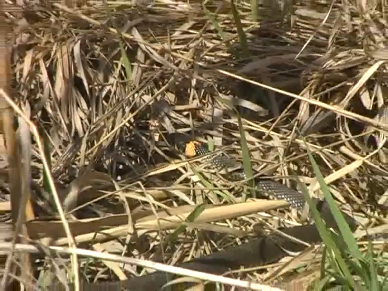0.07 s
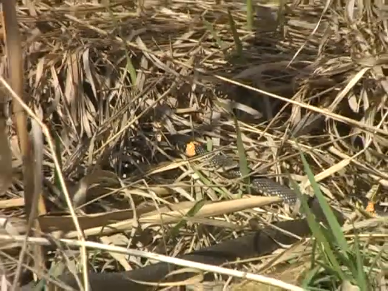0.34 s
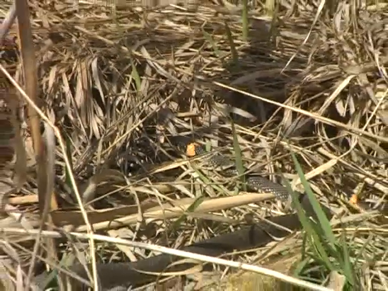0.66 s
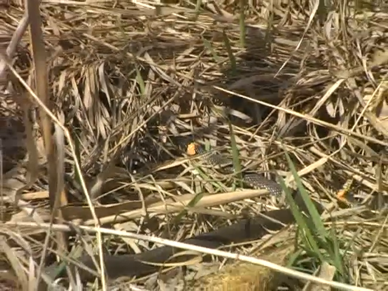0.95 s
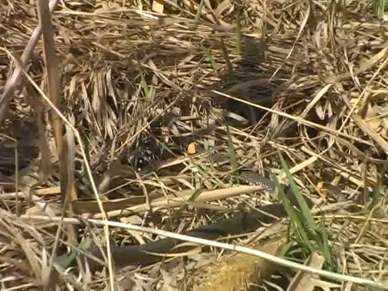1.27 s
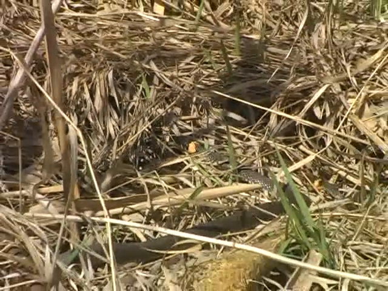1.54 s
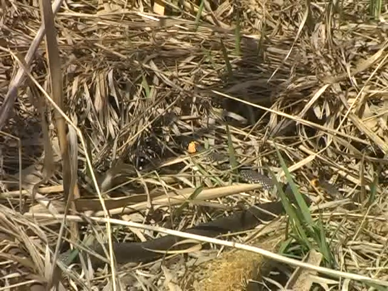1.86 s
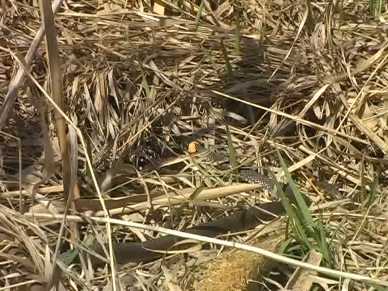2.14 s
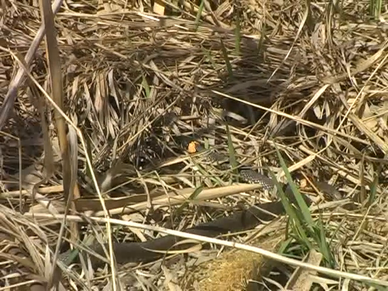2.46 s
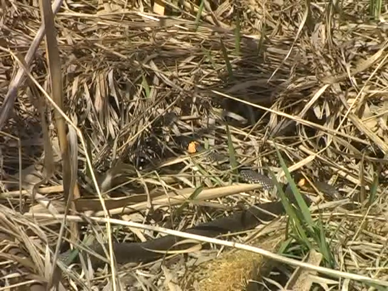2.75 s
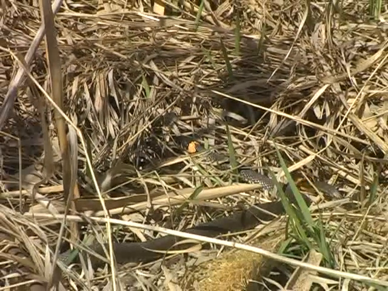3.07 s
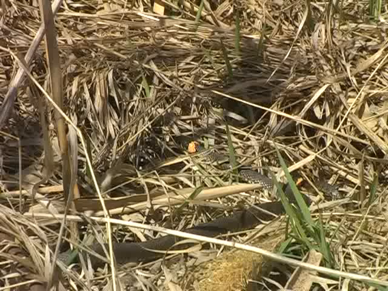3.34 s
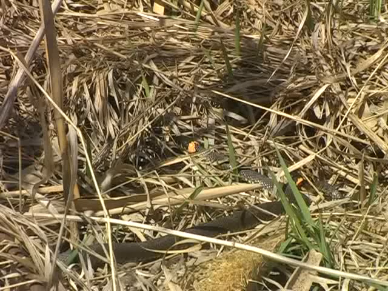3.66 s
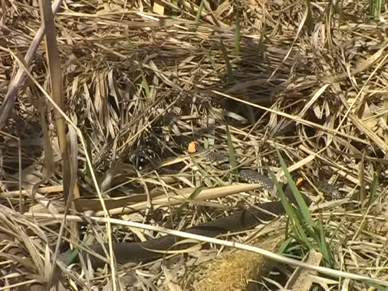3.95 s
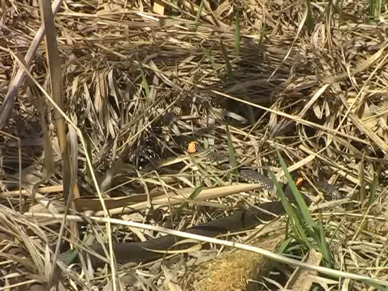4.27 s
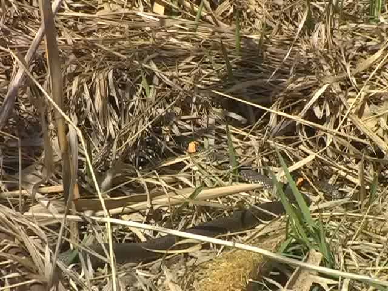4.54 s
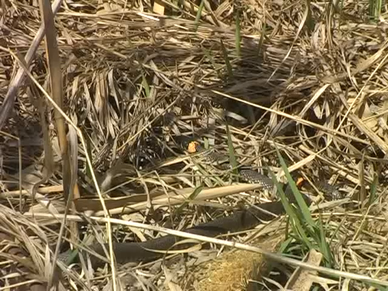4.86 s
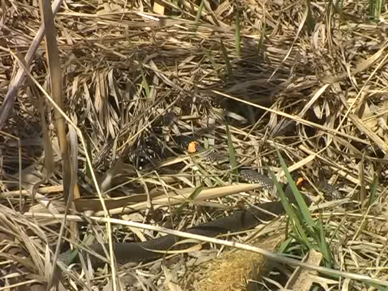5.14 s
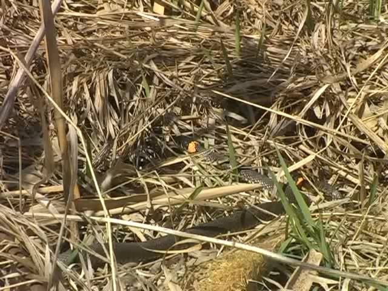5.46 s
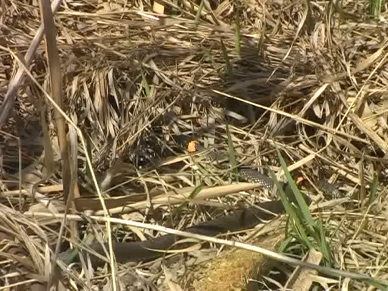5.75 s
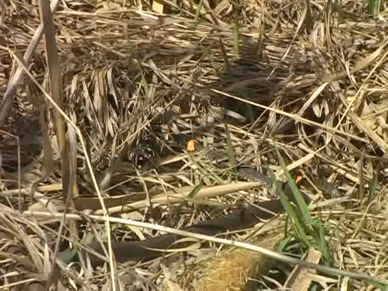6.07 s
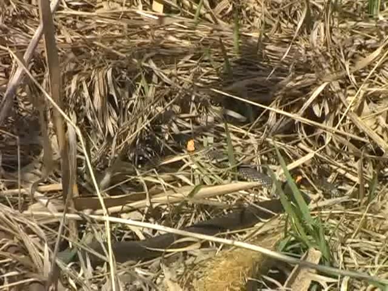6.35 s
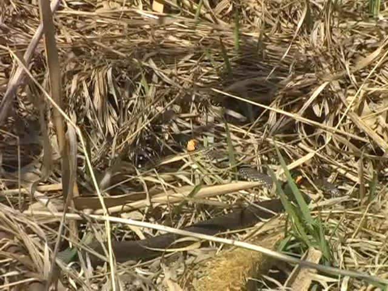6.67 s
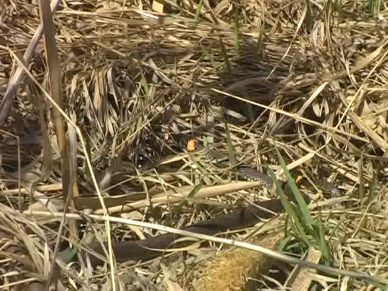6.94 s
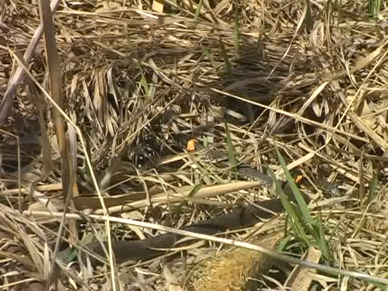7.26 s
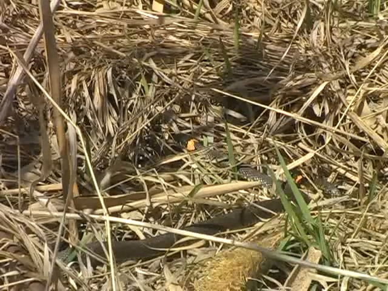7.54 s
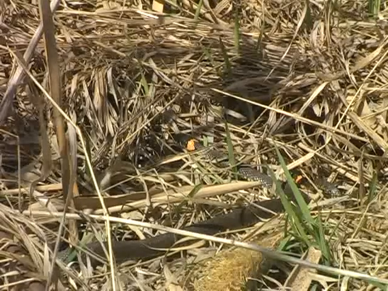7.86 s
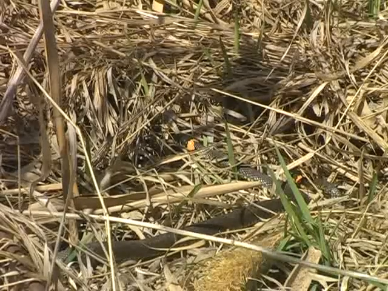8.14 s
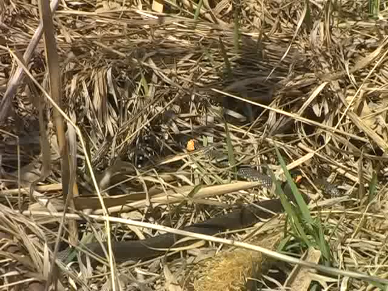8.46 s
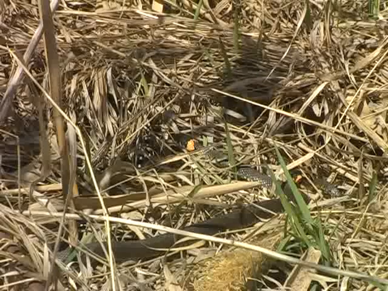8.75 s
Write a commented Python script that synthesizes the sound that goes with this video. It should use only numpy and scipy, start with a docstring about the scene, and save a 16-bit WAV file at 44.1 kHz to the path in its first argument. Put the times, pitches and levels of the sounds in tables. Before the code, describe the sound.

Outdoors, over a soft steady hiss and a very faint camera whine, nearby dry leaves rustle lightly with small sharp ticks. Thin, distant bird whistles fall in pitch early on. A brief crunch follows, then a quiet crow caw. The rustling swells into uneven bursts of crackling reeds and dull crunching litter, with several stalks cracking close by. The crow caws once more as the movement dies down.

```python
"""Dry reeds rustle outdoors as something moves through them in pushes: light ones make leaves tick and
whisper, hard ones crush stalks and snap a few, and the matted litter crunches dully underneath.
The rustle is countless tiny ringing fractures over rubbing noise; a snap is a crack and a short ring.
Far off a small bird whistles thin, falling notes, and later a crow caws twice through a resonant throat.
Under it all lie a steady hiss of open air and a camera's faint whine."""
import sys
import numpy as np
from scipy import signal
from scipy.fft import rfft, irfft, next_fast_len
from scipy.io import wavfile
from scipy.ndimage import map_coordinates

SR = 44100
rng = np.random.default_rng(int(sys.argv[2]) if len(sys.argv) > 2 else 0)


def output_pcm(signal):
    """Save a mono or channel-first signal as 16-bit PCM at the path in sys.argv[1].

    Samples are clipped to [-1, 1] before scaling.
    """
    pcm = np.clip(np.atleast_2d(signal).T, -1, 1) * 32767
    wavfile.write(sys.argv[1], SR, np.round(pcm).astype(np.int16))


N = 397208
TIME = np.arange(N) / SR


def amp(db):
    """Gain of a level in dB."""
    return 10 ** (np.asarray(db) / 20)


def unit(x):
    """x at rms 1."""
    return x / np.sqrt(np.mean(x ** 2) + 1e-20)


def curves(rows, t):
    """Breakpoint envelopes: each column after the time, joined by straight lines."""
    times, *columns = np.transpose(rows)
    return [np.interp(t, times, column) for column in columns]


def gain(points, hz):
    """Gain of an EQ curve through (frequency [Hz], level [dB]) points on a log axis."""
    frequencies, db = np.transpose(points)
    return amp(np.interp(np.log(hz + 1), np.log(frequencies), db))


def filtered(x, response):
    """x through a filter given as a function of frequency."""
    size = next_fast_len(N + 8192)
    return irfft(rfft(x, size) * response(np.fft.rfftfreq(size, 1 / SR)), size)[:N]


def coloured(x, eq):
    """x shaped by an EQ curve, at rms 1."""
    return unit(filtered(x, lambda hz: gain(eq, hz)))


def wobble(rate):
    """A smooth random curve, rate knots a second."""
    return map_coordinates(rng.standard_normal(int(N * rate / SR) + 4), [TIME * rate])


def fade(t, t60):
    """A decay of 60 dB in t60 seconds."""
    return 1000 ** (-t / t60)


def add(track, start, sound):
    """Mix a sound in at start seconds."""
    part = track[round(start * SR):][:len(sound)]
    part += sound[:len(part)]


def scatter(x, t60):
    """Diffuse reflections that die in t60 seconds."""
    tail = rng.standard_normal(SR) * fade(TIME[:SR], t60)
    return signal.fftconvolve(x, tail / np.linalg.norm(tail))[:N]


def air():
    """Steady outdoor hiss, a breeze that brushes the microphone at first, and the camera's faint whine."""
    # outdoor hiss, with a hollow near 4.8 kHz from the camera's noise reduction:
    # (frequency [Hz], relative level [dB])
    hiss_eq = [(25, -38), (55, -8), (90, 2), (200, 1.5), (450, 2), (1100, 2), (1800, -2), (2800, 1),
               (4000, -7), (4800, -17.5), (6300, -6), (8500, -6), (10500, -15)]
    # the breeze dying down: (time [s], level [dB])
    breeze = [(.15, -68.5), (.4, -77), (.7, -96)]
    # steady tones of the camera: (frequency [Hz], level [dB])
    whine_tones = [(1335, -75.5), (2925, -76), (8100, -83)]
    hiss = coloured(rng.standard_normal(N), hiss_eq) * amp(-57.0 + 0.12 * wobble(2.8))
    rumble = coloured(rng.standard_normal(N), [(15, -14), (75, 13), (150, -18), (500, -70)])
    whine = sum(amp(db) * unit(np.sin(2 * np.pi * hz * TIME)) for hz, db in whine_tones)
    return hiss + rumble * amp(curves(breeze, TIME)[0]) + whine


def push_levels():
    """Envelopes in dB of stalks, litter and leaves: every push adds its power to the resting rustle."""
    # rustle between pushes: (stalks [dB], litter [dB], leaves [dB])
    rest_db = [-64, -70, -63]
    # pushes through the reeds:
    # (peak time [s], swell [s], settle [s], stalks [dB], litter [dB re stalks], leaves [dB re stalks])
    pushes = [(.24, .5, 0.23, -59.5, -10, 2.5), (.75, 0.68, 0.39, -62, -5, -1.5),
              (2.35, 0.43, 0.73, -63, -13, 3), (3.07, 0.42, 0.66, -52.5, -2, -11),
              (3.48, 0.065, 0.26, -60.5, 6.5, -22), (4.53, 0.17, 0.3, -56.5, -8, -5),
              (4.9, 0.48, 0.94, -54, -12.5, -7), (5.78, 0.33, 0.47, -47, -10, -9),
              (6.15, .22, 0.062, -43, -5.5, -5), (6.39, .125, 0.079, -37.5, -6, -6.5),
              (6.685, 0.039, 0.039, -35.5, -12, -10.5), (6.87, 0.23, 0.23, -40, -13, -5.5),
              (7.16, 0.14, 0.099, -47, -14, -2.5), (7.38, 0.41, 0.29, -49, -10.5, -6),
              (7.71, 0.12, 0.1, -51.5, -8, -5), (7.89, 0.072, 0.17, -53.5, -5, -6),
              (8.18, 0.11, 0.17, -47, -17, -9.5), (8.37, 0.094, 0.24, -38, -13, -11),
              (8.67, 0.15, .1, -38, -8, -10), (8.9, 0.1, 0.18, -52.5, -11, -9)]
    range_db, roundness = 9.5, 1.25  # rise over a swell, fall over a settle; 1 = pointed top, 2 = round
    power = amp(rest_db)[:, None] ** 2 * np.ones(N)
    for peak, swell, settle, stalk_db, litter_db, leaf_db in pushes:
        from_peak = np.maximum((peak - TIME) / swell, (TIME - peak) / settle)
        near = from_peak < 6
        push_db = stalk_db - range_db * np.abs(from_peak[near]) ** roundness
        power[:, near] += np.outer(amp([0, litter_db, leaf_db]), amp(push_db)) ** 2
    return 10 * np.log10(power)


def crackle(per_s, top_hz, t60, spread_db):
    """Countless tiny fractures, each a damped ring of its own pitch and size, over rubbing noise."""
    rubbing = amp(5) * rng.standard_normal(N)
    when, pitch, size = rng.random((int(per_s * N / SR), 3)).T
    samples = np.arange(int(t60 * SR) + 2)
    t = samples / SR
    strength = amp(spread_db * np.minimum(-np.log(1 - size), 4))  # most are small, a few stand out
    rings = strength[:, None] * fade(t, t60) * np.sin(2 * np.pi * top_hz * pitch[:, None] * t)
    positions = (when * N).astype(int)[:, None] + samples
    fractures = np.bincount(positions.ravel(), rings.ravel(), N)[:N]
    return unit(fractures) + rubbing


def reeds():
    """Litter, stalks and leaves crackle together, catching and slipping unevenly."""
    # dull litter and midrange stalks: (frequency [Hz], relative level [dB])
    litter_eq = [(60, -27), (150, -12.5), (260, -4), (400, -1), (600, -0.5), (780, -2), (1200, -1),
                 (2200, -23)]
    stalk_eq = [(300, -31), (650, -9), (1000, -4), (1350, -0.5), (1900, -2.5), (2800, -2.5), (4200, -5),
                (5500, -8.5), (9000, -26)]
    # bright leaves, with a hollow near 4.8 kHz from the camera's noise reduction:
    # (frequency [Hz], relative level [dB])
    leaf_eq = [(2000, -24), (3800, -2), (4800, -6), (6300, 1), (8500, 1), (10000, -6), (12000, -20.5)]
    stalk_db, litter_db, leaf_db = push_levels()
    litter = coloured(crackle(per_s=500, top_hz=1480, t60=0.012, spread_db=0), litter_eq)
    stalks = coloured(crackle(per_s=1200, top_hz=6060, t60=0.0055, spread_db=2.5), stalk_eq)
    leaves = coloured(crackle(per_s=1200, top_hz=11100, t60=0.00078, spread_db=6.5), leaf_eq)
    # a light touch moves single blades in jerks; a hard push averages over many
    slip_db = wobble(55) * np.interp(stalk_db, [-58, -40], [1.2, 0.4])
    return amp(slip_db) * (litter * amp(litter_db) + stalks * amp(stalk_db) + leaves * amp(leaf_db))


def stray_flicks():
    """Fainter blades flick by chance: rows of (time [s], level [dB], pitch [Hz])."""
    per_s, spread_octaves = 6, 0.2
    when, size, pitch = rng.random((int(per_s * N / SR), 3)).T
    db = -46 + 2.5 * np.minimum(-np.log(1 - size), 2)
    hz = 6400 * 2 ** (spread_octaves * (2 * pitch - 1))
    return list(zip(when * TIME[-1], db, hz))


def ticks():
    """A blade springs free, or a stalk cracks, and rings for a few cycles."""
    # sharp high ticks: blades flicking, and the bright crack of one snapping stalk:
    # (time [s], level [dB], pitch [Hz])
    sharp_ticks = [(.262, -33.5, 8000), (0.434, -34, 4200), (.466, -42, 4500), (.7237, -26.5, 3040),
                   (.7239, -32, 7600), (.9515, -38, 6600), (1.1292, -34.5, 6400), (1.782, -29, 6150),
                   (1.7964, -31, 6300), (1.814, -33, 6040), (1.9704, -38, 6500), (2.1246, -36, 5900),
                   (2.265, -35, 8000), (2.908, -38, 6300), (2.937, -38, 6200), (3.0865, -35.5, 6900),
                   (3.7739, -40, 5000), (6.9359, -15, 6950), (7.228, -28, 7400)]
    attack_cycles = 0.84
    dry, t = np.zeros(N), TIME[:SR // 50]
    for start, db, hz in sharp_ticks + stray_flicks():
        swell = t * hz / attack_cycles
        add(dry, start, amp(db) * swell * np.exp(1 - swell) * np.sin(2 * np.pi * hz * t))
    return dry + amp(-4.5) * scatter(dry, t60=0.047)


def songbird():
    """Thin, slowly falling whistles from far away."""
    # the bird's notes: (time [s], length [s], start pitch [Hz], end pitch [Hz], level [dB])
    whistles = [(0.608, 0.12, 2720, 2450, -59), (1.48, 0.44, 3330, 3080, -70), (2.03, .32, 3000, 2820, -67)]
    dry = np.zeros(N)
    for start, length, from_hz, to_hz, db in whistles:
        progress = np.linspace(0, 1, int(length * SR))
        pitch = from_hz + (to_hz - from_hz) * progress
        tone = np.sin(2 * np.pi * np.cumsum(pitch) / SR)
        add(dry, start, amp(db) * np.sin(np.pi * progress) * tone)
    return dry + amp(-2) * scatter(dry, t60=0.81)


def stalk_snaps():
    """A stalk breaks with a sharp crack and rings in two bending modes; the reed bed scatters it."""
    # breaking stalks, ahead of the EQ: (time [s], level [dB], pitch [Hz], crack [dB re ring])
    breaks = [(3.018, -34, 1720, -13), (3.953, -39.5, 435, -17), (4.5363, -40, 1860, -5),
              (6.148, -23.5, 406, -21), (6.302, -31, 960, -3), (6.3894, -25, 810, -14),
              (6.6978, -24, 1120, -21), (6.9358, -17, 900, -5.5), (7.18, -20, 1450, -10),
              (7.4449, -10, 975, -8), (7.4456, -15, 1600, -7.5), (7.536, -34, 1200, -18),
              (7.7214, -32.5, 990, -10), (7.803, -35, 2770, -5), (8.1932, -26, 1600, -20),
              (8.197, -16.5, 1550, -24), (8.1979, -23.5, 1000, -22), (8.3654, -23.5, 1500, -12)]
    # bite of splintering fibre: (frequency [Hz], gain [dB])
    splinter_eq = [(600, 6), (1600, 10.0), (4400, 8.0), (5500, 5.5), (9000, -2), (12000, -7)]
    ring_cycles, low_cut_hz = 9.8, 330  # thin stalks radiate no bass
    rings, cracks, t = np.zeros(N), np.zeros(N), TIME[:SR // 10]
    for start, db, hz, crack_db in breaks:
        phase, t60 = 2 * np.pi * hz * t, ring_cycles / hz
        low_mode = fade(t, t60) * np.sin(phase)
        high_mode = amp(-6.5) * fade(t, t60 / 2) * np.sin(2.82 * phase)
        add(rings, start, amp(db) * (low_mode + high_mode))
        add(cracks, start, amp(db + crack_db) * fade(t, t60=0.0059) * rng.standard_normal(len(t)))
    splinters = filtered(cracks, lambda hz: gain(splinter_eq, hz))
    low_cut = signal.butter(2, low_cut_hz, "highpass", fs=SR, output="sos").repeat(2, axis=0)
    dry = signal.sosfilt(low_cut, rings + splinters)
    return dry + amp(-12.0) * scatter(dry, t60=0.091)


def crow():
    """Harmonics through one strong throat resonance; the voice flutters and breaks up toward the end."""
    # shape of one caw: (time from its start [s], pitch [Hz], effort [dB], hoarse pitch jitter [ratio])
    contour = [(0, 294.8, -6.5, 0.026), (.05, 324, -1, 0.012), (.13, 318, -2.5, 0.01),
               (.18, 300, -4, 0.042), (.23, 284, -2.5, .06), (.3, 273, -11, 0.036)]
    # the two calls: (time [s], level [dB], transposition [ratio])
    calls = [(5.115, -47, 1), (8.475, -43.5, 1.02)]
    # throat resonance: (frequency [Hz], relative level [dB])
    throat_eq = [(600, -45), (1000, -13), (1300, -25), (1550, 0.5), (1720, -4), (1950, -10.5), (2800, -38)]
    flutter_hz, flutter_db = 49, 1.4
    dry = np.zeros(N)
    for start, db, transpose in calls:
        calling = (TIME > start) & (TIME < start + contour[-1][0])
        pitch, effort_db, jitter = curves(contour, TIME[calling] - start)
        flutter = np.sin(2 * np.pi * flutter_hz * TIME[calling])
        pitch = transpose * pitch * (1 + jitter * wobble(170)[calling] + 0.02 * flutter)
        phase = 2 * np.pi * np.cumsum(pitch) / SR
        voice = sum(gain(throat_eq, k * pitch) * np.sin(k * phase) for k in range(2, 10))
        dry[calling] += unit(voice) * amp(db + effort_db + flutter_db * flutter)
    return dry + amp(-12.5) * scatter(dry, t60=0.26)


def notches(hz, spacing_hz, width_hz, depth):
    """A comb of narrow notches that widen with frequency and lie twice as far apart in the treble."""
    response = np.ones(len(hz), complex)
    for centre in spacing_hz * np.r_[1:19, 20:30:2]:
        band = 1j * hz * width_hz * (1 + centre / 6000)
        response *= 1 - depth * band / (centre ** 2 - hz ** 2 + band)
    return response


def scene():
    """Reeds nearby, birds far off and open air, in one channel."""
    return (reeds() + stalk_snaps() + ticks() + crow() + songbird() + air())[None]


def record(dry):
    """The camera notches out the overtones of its motor and keeps nothing above its band limit."""
    # the camera's top end: (frequency [Hz], gain [dB])
    rolloff = [(10500, 0.5), (11000, -14.5), (12000, -11)]
    motor_hz, band_limit_hz = 300, 12200

    def response(hz):
        comb = notches(hz, motor_hz, width_hz=41.4, depth=0.61)
        return comb * (hz < band_limit_hz) * gain(rolloff, hz)

    return filtered(dry[0], response)[None]


dry = scene()
out = record(dry)
output_pcm(out)
```